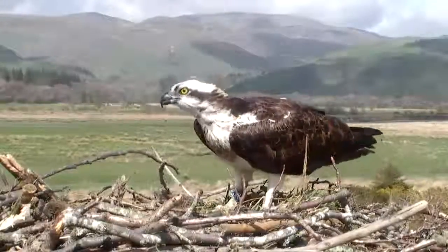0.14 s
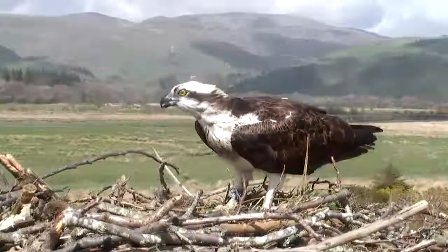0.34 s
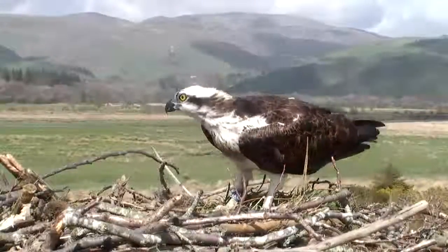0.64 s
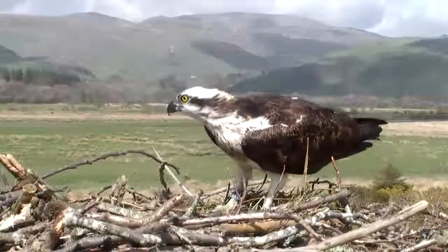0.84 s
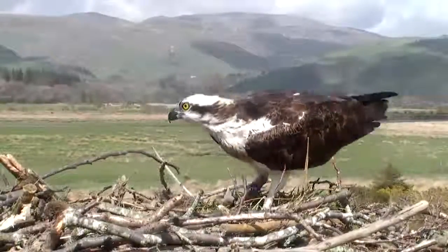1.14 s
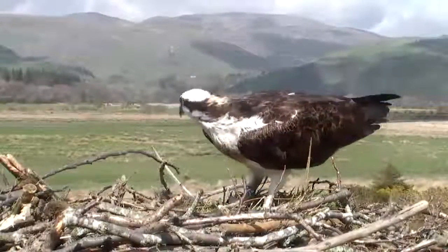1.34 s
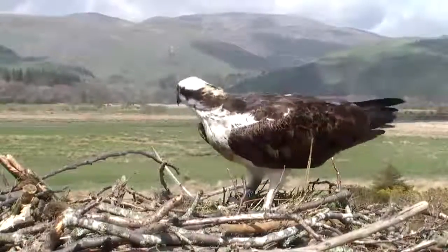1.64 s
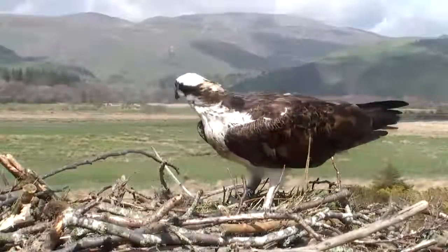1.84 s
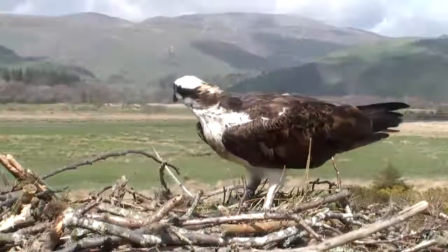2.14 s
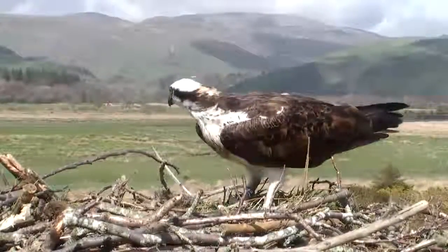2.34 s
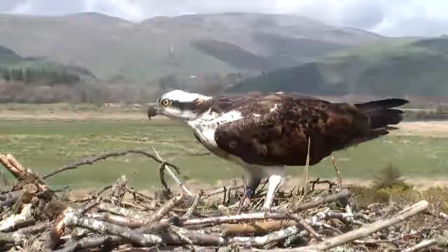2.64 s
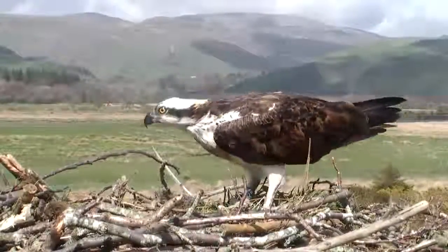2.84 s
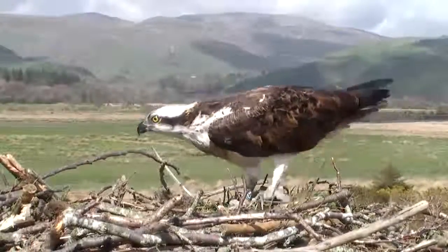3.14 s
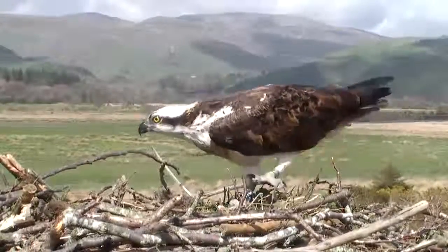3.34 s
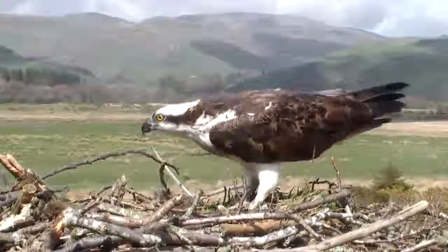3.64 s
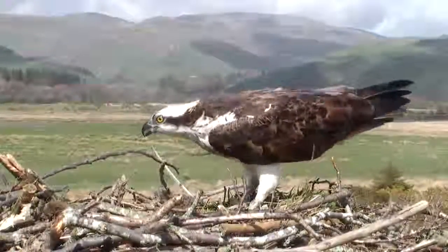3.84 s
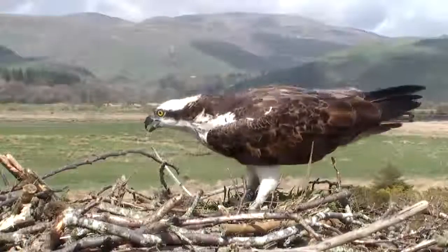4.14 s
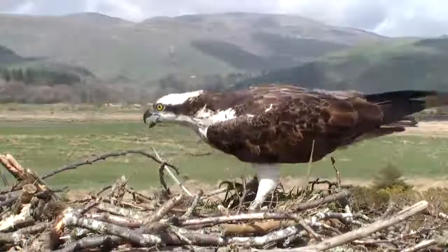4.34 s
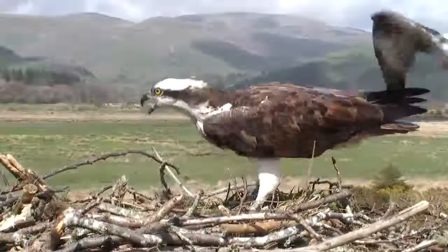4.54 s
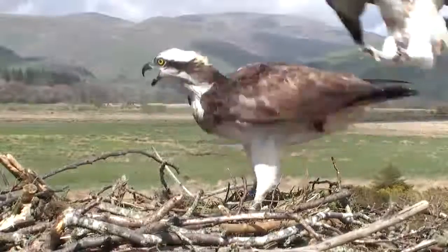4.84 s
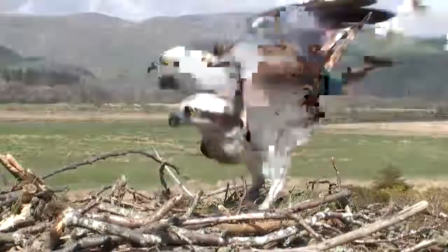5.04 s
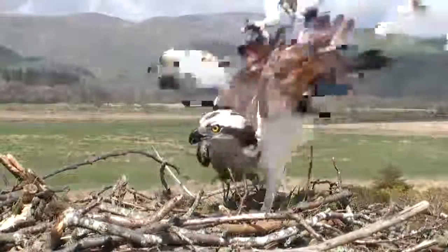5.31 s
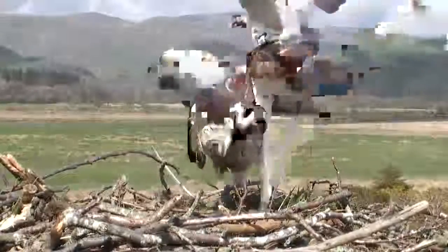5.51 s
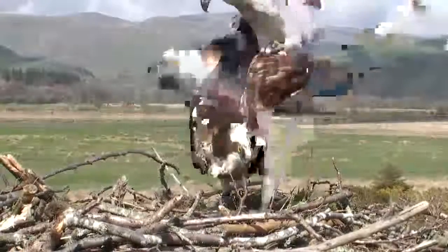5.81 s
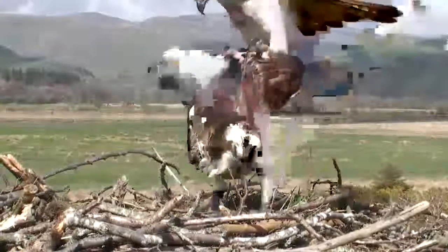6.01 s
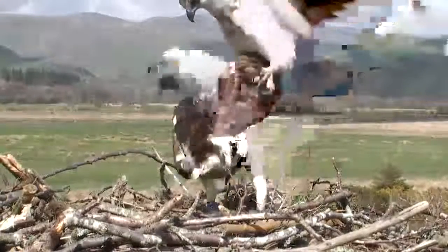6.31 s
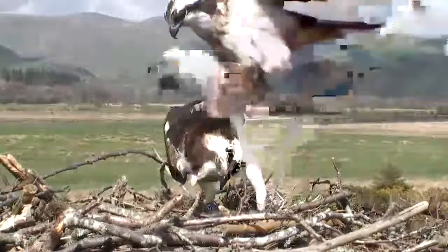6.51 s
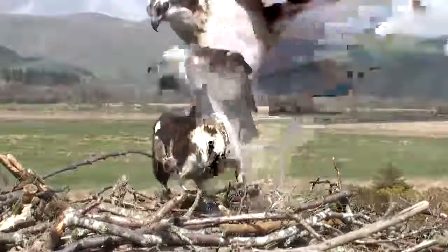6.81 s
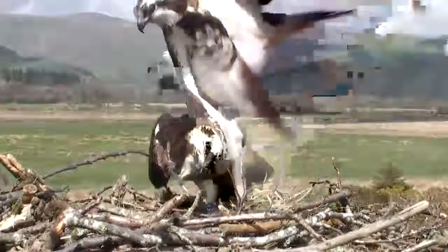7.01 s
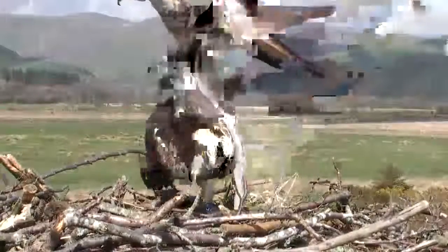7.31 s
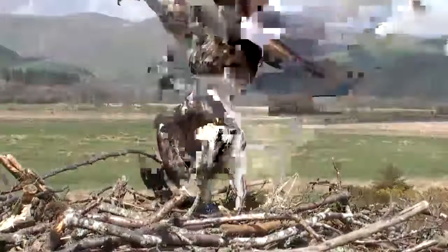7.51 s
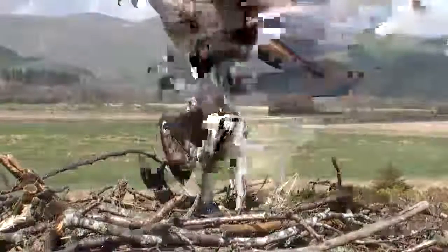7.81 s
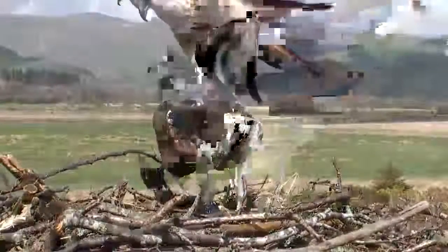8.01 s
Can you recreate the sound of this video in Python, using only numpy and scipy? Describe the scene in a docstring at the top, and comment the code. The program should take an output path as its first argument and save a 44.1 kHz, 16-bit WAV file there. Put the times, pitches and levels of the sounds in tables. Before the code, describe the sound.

A fast series of high, whistled bird chirps runs through low, rumbling, overloading wind. The gusts ease in the middle, leaving the calls clear with only a faint echo off open land. Sparse woody ticks come from sticks underfoot. The chirps become more urgent and rough, then break into very short squeaky chips as strong gusts return and wings swish faintly. The bird falls silent near the end, with light wind and a few thumps.

```python
"""From the start, gusts thump the microphone at an osprey's nest and overload it, chopping up the calls.
Through the wind the bird whistles a fast run of arched chirps that turn harsher, with a faint echo off the field.
From 2.5 s on, twigs tick underfoot: little bursts of noise that ring like dry wood.
Near 5 s its mate comes in on a faint swish of feather noise, and the voice breaks into short hoarse chips.
The voice is a gliding whistle with overtones and a rough shake; wind and wings are coloured noise."""
import sys
import numpy as np
from scipy import signal
from scipy.fft import rfft, irfft, next_fast_len
from scipy.io import wavfile
from scipy.ndimage import map_coordinates

SR = 44100
rng = np.random.default_rng(int(sys.argv[2]) if len(sys.argv) > 2 else 0)


def inscribe(sig):
    """Save sig as 16-bit PCM at rate SR to the path in sys.argv[1].

    A 1-D sig is mono; a 2-D sig holds one channel per row.
    Samples are clipped to [-1, 1] before scaling.
    """
    pcm = np.round(np.clip(np.atleast_2d(sig).T, -1, 1) * 32767)
    wavfile.write(sys.argv[1], SR, pcm.astype(np.int16))


N = 359712
TIME = np.arange(N) / SR


def amp(db):
    """Turn decibels into a gain."""
    return 10 ** (np.asarray(db) / 20)


def unit(x):
    """Scale to an average strength (rms) of 1."""
    return x / np.sqrt(np.mean(x ** 2) + 1e-20)


def along(points, hz):
    """Read a value off (f/Hz, value) points, evenly in pitch rather than in Hz."""
    f, v = np.transpose(points)
    return np.interp(np.log(hz + 1), np.log(f + 1), v)


def value_at(t, rows):
    """Read a value off (t/s, value) rows."""
    return np.interp(t, *np.transpose(rows))


def wobble(rate, n=N):
    """A smooth random curve through `rate` random points a second."""
    points = rng.standard_normal(int(n * rate / SR) + 4)
    return map_coordinates(points, [np.arange(n) * rate / SR])


def filtered(x, response):
    """Change the strength and timing of each frequency in x by response(hz)."""
    m = next_fast_len(len(x) + SR // 10)
    hz = np.fft.rfftfreq(m, 1 / SR)
    return irfft(rfft(x, m) * response(hz), m)[:len(x)]


def noise(spectrum):
    """Random noise coloured by a spectrum, at rms 1."""
    return unit(filtered(rng.standard_normal(N), lambda hz: amp(along(spectrum, hz))))


def fade(t, length, edge):
    """Soft opening and closing of a sound."""
    nearest_end = np.minimum(t, length - t)
    return np.sin(np.pi / 2 * np.clip(nearest_end / edge, 0, 1)) ** 2


def add(track, s, sound):
    """Mix a sound into the track at time s."""
    part = track[round(s * SR):][:len(sound)]
    part += sound[:len(part)]


# gusts hitting the microphone: t/s, hold/s, level/dB
GUSTS = [(0.142, 0.026, -18), (0.325, 0.45, -13.5), (.47, .22, -9), (1.059, .1, -5.5), (1.866, .74, -16),
         (2.023, .27, -9.5), (3.03, .38, -31.5), (4.307, 0.076, -26), (4.738, 0.1, -18),
         (4.836, .08, -11.5), (5.042, 0.032, -22), (5.395, 0.969, -15.5), (5.419, .13, -6.5),
         (5.62, .13, -10.5), (5.85, .29, -7.5), (6.874, 0.06, -15), (7.01, 0.11, -23), (7.535, 0.21, -24),
         (7.809, 0.056, -16), (8.08, .08, -19.5)]


def pressure():
    """Force of the wind: each gust hits and drops fast inside a weaker, slower skirt, over a constant breeze."""
    rise_db_per_s, fall_db_per_s = 704.5, 303
    skirt_start_db, skirt_db_per_s, breeze_db = -15.5, 41.5, -34.5
    power = amp(breeze_db) ** 2
    for s, hold_s, db in GUSTS:
        before, after = np.maximum(s - TIME, 0), np.maximum(TIME - s - hold_s, 0)
        core_db = -rise_db_per_s * before - fall_db_per_s * after
        skirt_db = skirt_start_db - skirt_db_per_s * (before + after)
        power = power + amp(db + np.maximum(core_db, skirt_db)) ** 2
    return np.sqrt(power)


# deep thumping of the eddies, only the shape counts: f/Hz, level/dB
BUFFET_SPECTRUM = [(12, -21.5), (25, -4), (45, 0), (70, -2), (110, -12.5), (200, -25.5), (400, -37.5),
                   (800, -57), (1600, -81.5), (4000, -120)]
# air rushing through the nest and over the field, before a common gain: t/s, level/dB
AIR = [(0.0, -42.5), (0.29, -43.5), (0.63, -39), (0.95, -39), (1.41, -42), (2.04, -36), (4.36, -44.5),
       (4.7, -43), (5.31, -43.5), (5.63, -37.5), (6.02, -34), (6.45, -46), (6.77, -44), (8.16, -50)]
# colour of that rush, only the shape counts: f/Hz, level/dB
RUSH_SPECTRUM = [(40, -13.5), (120, 5.5), (230, 7), (400, 0), (600, -0.5), (800, -11), (1050, -15.5),
                 (1300, -22.5), (2000, -29), (3500, -38.5), (6000, -45), (10000, -52.5)]


def wind(air_gain_db=6, flurry_db=1.0, eddy_db=2.0):
    """Eddies of uneven force thump the microphone over a steadier rush of air."""
    eddies = amp(eddy_db * wobble(45)) * noise(BUFFET_SPECTRUM)
    buffet = pressure() * unit(eddies)
    rush_db = value_at(TIME, AIR) + air_gain_db + flurry_db * wobble(11)
    return buffet + amp(rush_db) * noise(RUSH_SPECTRUM)


def field(x, delay_s=.06, echo_db=-26, tail_db=-22, t60_s=.6):
    """The land returns one faint echo and a thin dying scatter, both dulled in the treble."""
    t = np.arange(SR // 2) / SR
    answer = rng.standard_normal(len(t)) * amp(-60 * t / t60_s)
    answer *= amp(tail_db) / np.linalg.norm(answer)
    answer[round(delay_s * SR)] += amp(echo_db)
    returned = signal.fftconvolve(x, answer)[:N]
    return filtered(returned, lambda hz: 1 / (1 + (hz / 5500) ** 4))


# swish of the landing bird's wings: t/s, level/dB
WINGS = [(4.85, -87), (5, -69), (5.1, -71), (5.25, -66), (5.4, -64.5), (5.7, -72), (6, -62), (6.4, -62),
         (6.8, -68), (7.3, -69), (7.6, -68)]
# colour of air through flight feathers, only the shape counts: f/Hz, level/dB
FEATHERS = [(600, -30), (1800, 0), (3000, -3), (4200, -7), (5000, -7.5), (6500, -10), (8500, -17),
            (14000, -32)]


def wings(flutter_db=2):
    """Feathers swish faintly as the second bird brakes: noise with an unsteady level."""
    return amp(value_at(TIME, WINGS) + flutter_db * wobble(25)) * noise(FEATHERS)


# twigs under the talons, peaks before a common gain: t/s, level/dB
TWIGS = [(2.5027, -33), (2.7224, -38), (3.2908, -34.5), (3.478, -33.5), (4.6049, -40.5), (4.7726, -35.5),
         (4.8143, -34.5), (6.4755, -35), (6.701, -39.5), (6.886, -38), (6.93, -39), (7.8076, -37.5)]
# ringing tones of a dry stick: f/Hz, width/Hz, level/dB
STICK = [(1484, 47, 15), (2490, 430, -5), (4200, 680, -11), (6600, 1200, -10), (8000, 1700, -13.5)]


def wood(f):
    """How a stick answers each frequency: a few resonances added with alternating signs."""
    total = 0
    for k, (center, width, db) in enumerate(STICK):
        resonance = 1j * f * width / (center * center - f * f + 1j * f * width)
        total = total + (-1) ** k * amp(db) * resonance
    return total


def twigs(t60_s=0.041, gain_db=-3):
    """A stick slips in a brief dying burst of tiny snaps that make it ring."""
    out, t = np.zeros(N), np.arange(SR // 10) / SR
    for s, db in TWIGS:
        snaps = rng.standard_normal(len(t)) * amp(1.9 * wobble(870, len(t)) - 60 * t / t60_s)
        tick = filtered(snaps, lambda f: wood(f) / (1 + (f / 9000) ** 8))
        add(out, s, amp(db + gain_db) * tick / np.abs(tick).max())
    return out


# overtones of the whistle, before brightness and beak: multiple of the pitch, level/dB
OVERTONES = [(2, -17.5), (3, -25.5)]


def syrinx(pitch_hz, rasp, beak, bright_db, beat_hz=760, jitter=0.0094, flutter_db=2.25):
    """A whistle with overtones; rasp adds a shake at half the pitch, a loose slower beat and random scatter."""
    n = len(pitch_hz)
    unsteady_pitch = pitch_hz * (1 + jitter * (wobble(153, n) + 4 * rasp * wobble(900, n)))
    phase = 2 * np.pi * np.cumsum(unsteady_pitch) / SR
    whistle = np.sin(phase)
    beat = np.cos(2 * np.pi * beat_hz * np.arange(n) / SR + 0.55 * wobble(200, n))
    # the shake puts side lines around the pitch, and more strongly around the overtones
    shake = rasp * (.62 * beat + .4 * np.cos(phase / 2) + .4 * wobble(2600, n))
    upper = sum(amp(db + bright_db + 2.5 * wobble(110, n)) * np.sin(round(k) * phase)
                for k, db in OVERTONES)
    extras = whistle * shake + upper * (1 + 1.6 * shake)
    colour = filtered(extras, lambda hz: amp(along(beak, hz)))
    return np.sqrt(2) * (whistle + colour) * amp(flutter_db * wobble(158, n))


def note(start, end, pitches, levels, rasp, beak, bright_db, edge=.004):
    """One stretch of voice: its onset time and sound. Pitches and levels are evenly spaced in time."""
    t = np.arange(start - edge / 2, max(end, start + edge) + edge / 2, 1 / SR)
    spread = lambda values: np.interp(t, np.linspace(t[0], t[-1], len(values)), values)
    voice = syrinx(spread(pitches), rasp, beak, bright_db)
    return t[0], voice * amp(spread(levels)) * fade(t - t[0], t[-1] - t[0], edge)


# throat and beak in the short chips, for overtones and side lines: f/Hz, level/dB
CHIP_BEAK = [(1000, -10.5), (1700, -4), (2900, -5.5), (3900, -15.5), (4900, -1.5), (6000, -5.5),
             (7200, -10.5), (8500, -23), (11000, -31)]


def chip(s, length, pitches, db, sag_db=6.5):
    """One short hoarse note that swells a little and then sags."""
    levels = [db - 4, db - .5, db - sag_db]
    return note(s, s + length, pitches, levels, rasp=.5, beak=CHIP_BEAK, bright_db=0.5)


# rising chips: t/s, climb/s, hook after it/s, start f/Hz, top f/Hz, level/dB
RISING_CHIPS = [(5.35, 0.015, 0.0074, 2550, 3200, -44), (5.58, 0.017, 0.0018, 3020, 3840, -28.5),
                (5.796, .016, 0.0038, 2990, 3890, -27.5), (6.047, 0.017, 0.0059, 2306, 2320, -26),
                (6.297, .033, 0.0092, 2402, 2720, -29), (6.567, 0.014, .024, 2393, 2430, -29),
                (6.834, 0.017, 0.016, 2377, 2600, -28.5), (7.046, 0.01, 0.016, 2370, 2570, -32.5)]
# falling chips: t/s, level/dB, level of the squeak before it/dB
FALLING_CHIPS = [(5.426, -37, -55), (5.657, -43, -49), (5.887, -39.5, -38), (6.408, -27.5, -41),
                 (6.662, -26.5, -41), (7.163, -33, -59)]
# pitches of the slide in every falling chip, evenly spaced in time: f/Hz
SLIDE_HZ = [2670, 2366, 2350, 2240]
# pitches of the squeak out of a rising chip, evenly spaced in time: f/Hz
SQUEAK_UP_HZ = [4200, 5500, 6300, 6400]
# pitches of the squeak into a falling chip, evenly spaced in time: f/Hz
SQUEAK_DOWN_HZ = [5700, 4970, 4200, 3300]


def chips(squeak_s=0.0097, slide_s=.02, shortest_hook_s=.008):
    """The voice cracks: a chip rises and squeaks out, or a squeak drops into a falling chip."""
    out = np.zeros(N)
    # the hook jumps to a middle register, then bends down
    hook_hz = 2967 - 520.2 * np.linspace(0, 1) ** 3
    for s, climb_s, hook_s, start_hz, top_hz, db in RISING_CHIPS:
        add(out, *chip(s, climb_s, [start_hz, top_hz], db))
        # a hook too short to sound is left as a gap
        if hook_s > shortest_hook_s:
            add(out, *chip(s + climb_s, hook_s, hook_hz, db - 5))
        add(out, *chip(s + climb_s + hook_s, squeak_s, SQUEAK_UP_HZ, db - 28))
    for s, db, squeak_db in FALLING_CHIPS:
        add(out, *chip(s - squeak_s, squeak_s, SQUEAK_DOWN_HZ, squeak_db))
        add(out, *chip(s, slide_s, SLIDE_HZ, db))
    return out


# harshness of the voice, scaled for each part of a chirp: t/s, rasp (0-1)
RASP = [(0, 0), (1.5, 0.13), (2.7, 0.15), (3.3, 0.13), (4.2, 0.22), (5.1, 0.05)]
# overtone strength as the voice and the head turn change: t/s, level/dB
SHINE = [(0, -1.5), (1.3, -0.5), (2, -1), (2.7, 4), (3.2, -1.5), (3.7, -2), (4.2, -1), (4.7, 3.5),
         (5.2, 5.5)]
# alarm as the mate flies in: t/s, alarm (0-1)
ALARM = [(3.2, 0), (4.4, .15), (4.649, 0.7), (5.119, 0.99)]
# throat and beak in the long chirps, for overtones and side lines: f/Hz, level/dB
BEAK = [(1000, -18), (1500, 7.5), (2000, 0), (2700, 9), (3400, -6), (3900, -9), (4600, -6), (5300, -14),
        (6000, -7), (6700, -4.5), (7500, -9.5), (8500, -20), (11000, -22)]


def chirp(start, length, climb_s, start_hz, climb_hz, crest_hz, db, tail_db):
    """One chirp in parts: a smoother climb, a rougher crest that falls, and a low tail; high crests thin out."""
    rasp, bright, alarm = (value_at(start, rows) for rows in (RASP, SHINE, ALARM))
    rough = 1.9 * rasp
    brk, end = start + climb_s, start + length
    # alarm draws out the tail and makes it hoarse
    drop = end - .014 - alarm * .014
    rise_hz = start_hz + climb_hz

    # the climb swells in and weakens towards the break in the voice
    swell_in = -6.5 * np.exp(-np.linspace(0, climb_s) / .0062)
    swell = swell_in + 1 - 5.5 * np.linspace(0, 1) ** 2
    climb = note(start, brk, [start_hz, rise_hz], db + swell, 0.44 * rasp, BEAK, bright - 2)

    # the crest loses 24 dB for each octave above its easiest pitch, 2670 Hz
    crest_db = db - 24 * np.log2(crest_hz / 2670)
    last_hz, middle_hz = min(2665, crest_hz), 3006
    if crest_hz > 3393 and rise_hz < middle_hz:
        # a wide leap is made in steps: the voice catches on the middle register going up and coming down
        up, down = brk + 0.34 * (drop - brk), brk + 0.67 * (drop - brk)
        top_hz = [.98 * crest_hz, crest_hz, 1.1 * crest_hz]
        return_hz = [1.05 * middle_hz, middle_hz, last_hz]
        crest = [note(brk, up, [.96 * middle_hz, middle_hz], [crest_db, crest_db], rough, BEAK, bright + 2),
                 note(up, down, top_hz, [crest_db + 3, crest_db - 11], rough, BEAK, bright - 2),
                 note(down, drop, return_hz, [db + 0.5, db - 6], rough, BEAK, bright + 4)]
    else:
        arch_hz = [max(rise_hz, .94 * crest_hz), .985 * crest_hz, crest_hz,
                   (last_hz + crest_hz) / 2, last_hz]
        arch_db = [crest_db, crest_db - 1.5, crest_db, db - 3, db - 1.5]
        crest = [note(brk, drop, arch_hz, arch_db, rough, BEAK, bright + 1)]

    tail_levels = tail_db - 1.5 - np.array([0, 0, 11])
    tail_rasp = 0.83 * rasp + alarm * .5
    tail = note(drop, end, [2260, 1990], tail_levels, tail_rasp, BEAK, bright + 2)
    return [climb, *crest, tail]


# arched chirps, levels before shaping:
# t/s, length/s, climb/s, start f/Hz, climb by f/Hz, crest f/Hz, level/dB, tail level/dB
CHIRPS = [(0.081, 0.076, .011, 2490, 250, 2950, -35, -34), (0.3, 0.061, .021, 2284, 170, 2417, -32.5, -36),
          (0.515, .080, 0.041, 2334, 173, 2590, -29.5, -28.5),
          (0.72, 0.082, 0.042, 2265, 303, 3020, -31, -34),
          (.919, 0.092, 0.018, 2790, 350, 3230, -34, -32.5), (1.117, 0.1, 0.035, 2275, 397, 3400, -32, -34),
          (1.325, 0.1, .051, 2280, 383, 3164, -31.5, -33),
          (1.538, 0.11, 0.041, 2320, 345, 3240, -34.5, -35.5),
          (1.741, .110, 0.026, 2290, 338, 3430, -34.5, -38.5),
          (1.951, 0.12, 0.025, 2190, 403, 3800, -34.5, -40.5),
          (2.175, 0.11, 0.024, 2280, 425, 3720, -35.5, -42),
          (2.384, 0.11, 0.026, 2120, 450, 3690, -35.5, -38.5),
          (2.609, 0.12, 0.037, 2110, 350, 3800, -34.5, -47),
          (2.844, 0.1, 0.061, 2050, 390, 2880, -35, -35.5),
          (3.152, .100, 0.035, 2040, 317, 2856, -32.5, -35),
          (3.415, .104, 0.032, 2536, 350, 3210, -34, -29),
          (3.652, 0.094, 0.029, 2640, 345, 3210, -34, -27.5),
          (3.87, 0.1, 0.038, 2645, 241, 3382, -32, -27.5), (4.089, 0.11, 0.05, 2184, 306, 3270, -34, -30),
          (4.335, 0.11, 0.057, 2237, 60, 3360, -33.5, -29.5),
          (4.641, 0.077, 0.03, 2660, 770, 3550, -38, -31.5),
          (4.893, 0.093, 0.028, 2380, 810, 3800, -29, -31.5),
          (5.122, .089, 0.024, 2440, 1300, 4400, -29.5, -32.5)]


def chirps():
    """The run of arched chirps, each joined from its separate stretches of voice."""
    out = np.zeros(N)
    for row in CHIRPS:
        for onset, sound in chirp(*row):
            add(out, onset, sound)
    return out


def scene():
    """Wind, nest and birds at one microphone."""
    birds = chirps() + chips()
    return (wind() + field(birds) + wings() + twigs() + birds)[None]


def saturate(x, top, hardness):
    """An amplifier stage that cannot swing beyond top."""
    return x / (1 + np.abs(x / top) ** hardness) ** (1 / hardness)


# colour of the amplifier hiss, only the shape counts: f/Hz, level/dB
HISS_SPECTRUM = [(100, -7.5), (1500, 14.5), (4500, 1), (7000, -5), (9500, -1), (14500, 2.5), (16000, -17.5)]


def record(dry, coupling_hz=26, rail=0.246, hiss_db=-69, top_hz=15700):
    """The preamplifier clips, its coupling capacitor makes the flat tops droop, and the next stage clips again."""
    clipped = np.clip(dry[0], -rail, rail)
    drooped = filtered(clipped, lambda hz: 1j * hz / (coupling_hz + 1j * hz))
    second = saturate(drooped, top=.257, hardness=30) * fade(TIME, TIME[-1], .004)
    hissing = second + amp(hiss_db) * noise(HISS_SPECTRUM)
    # nothing passes above top_hz
    return filtered(hissing, lambda hz: hz < top_hz)[None]


dry = scene()
out = record(dry)
inscribe(out)
```